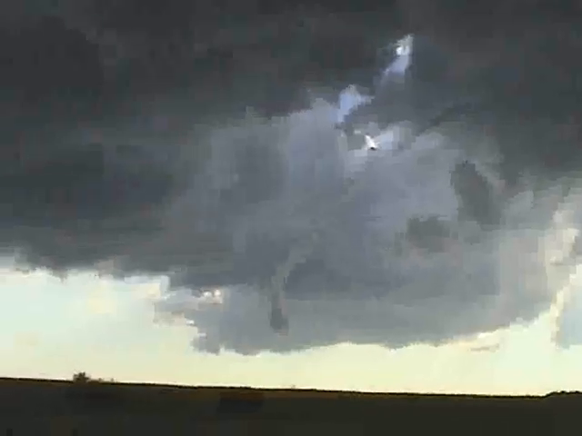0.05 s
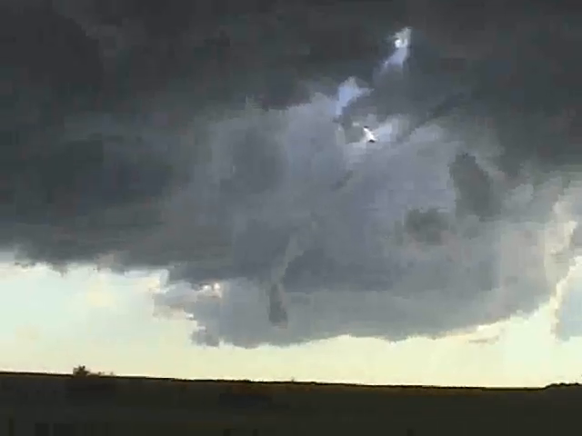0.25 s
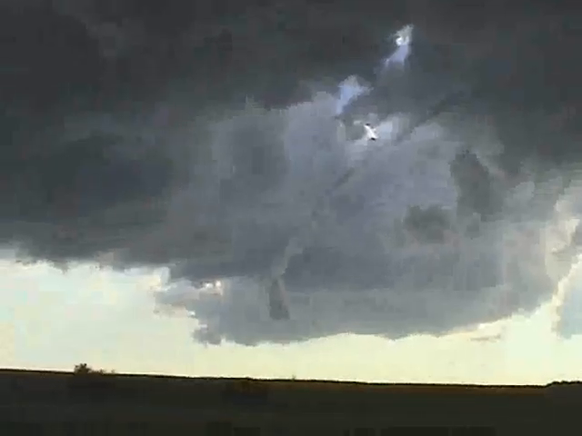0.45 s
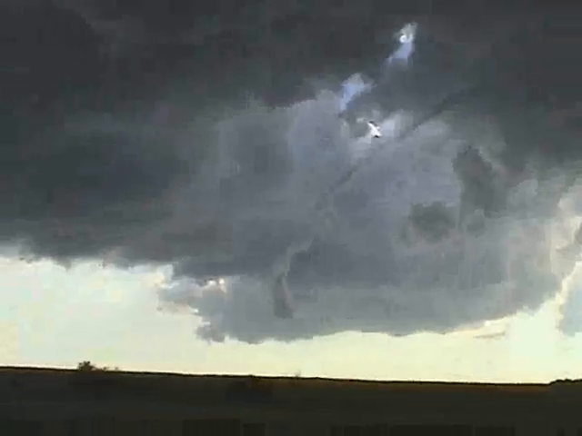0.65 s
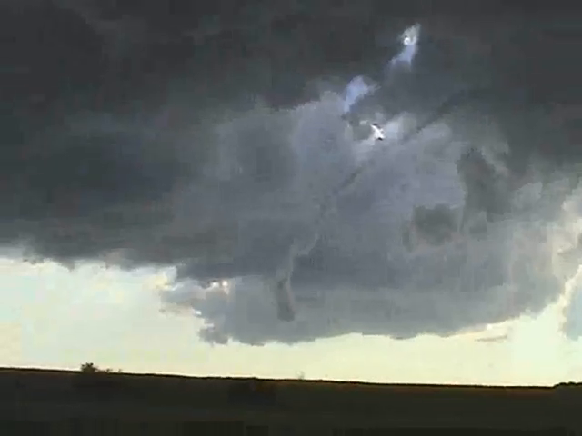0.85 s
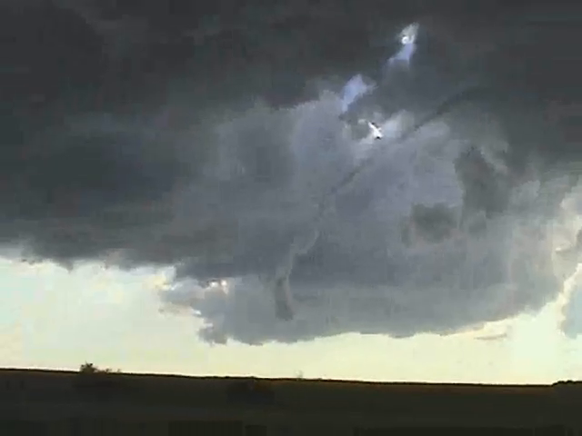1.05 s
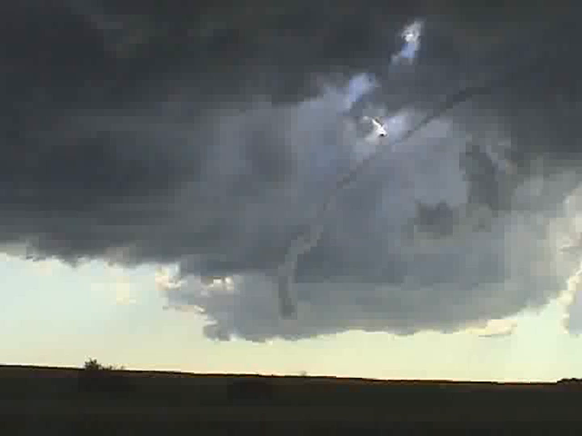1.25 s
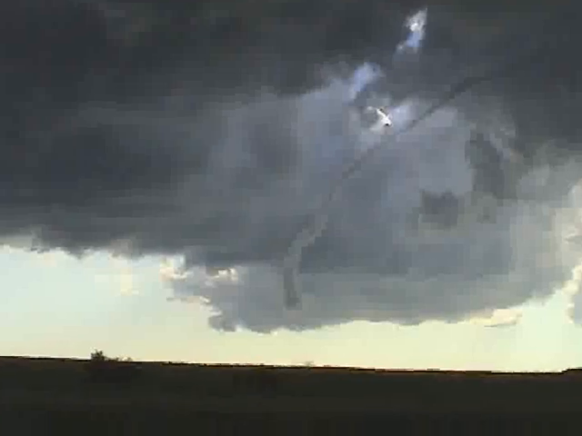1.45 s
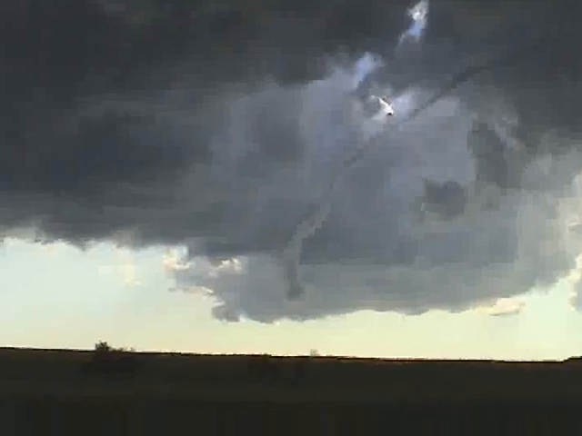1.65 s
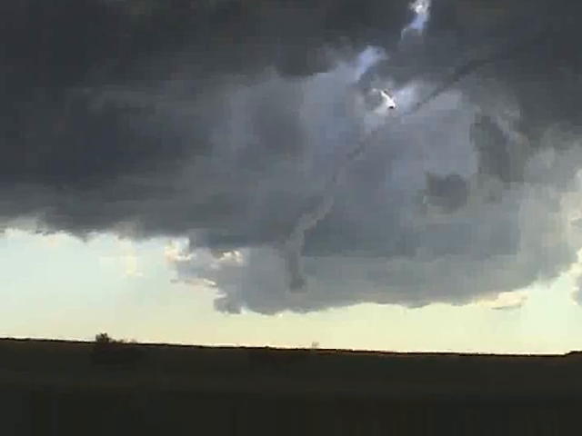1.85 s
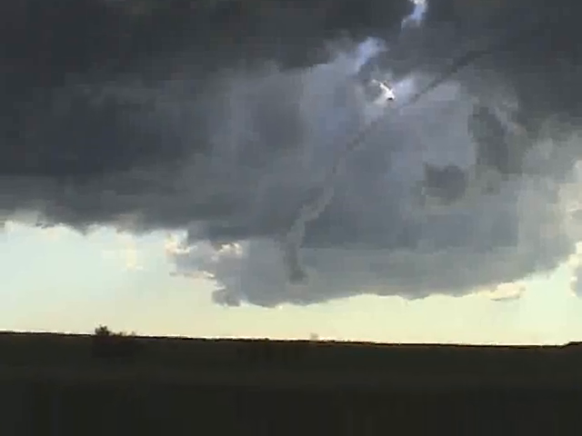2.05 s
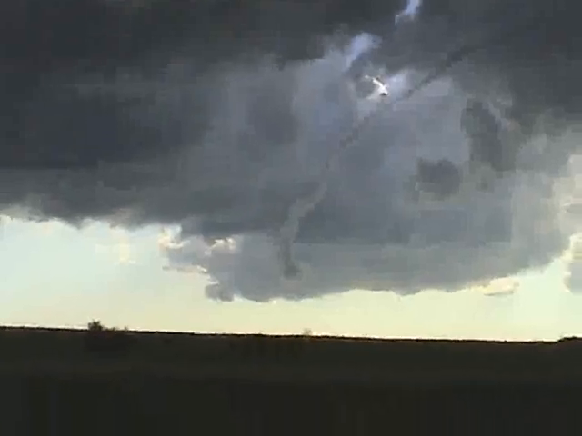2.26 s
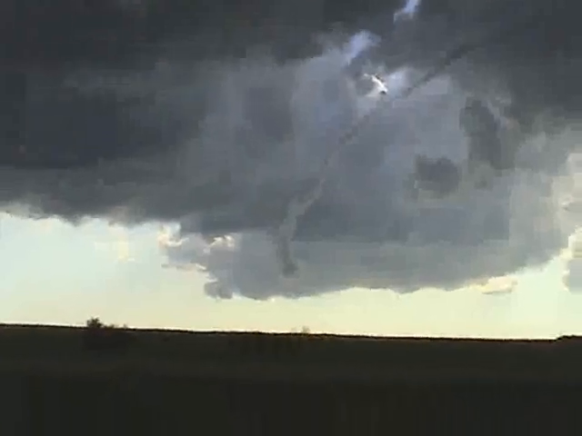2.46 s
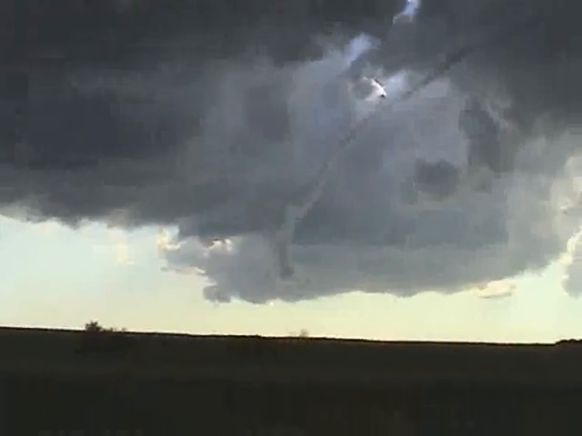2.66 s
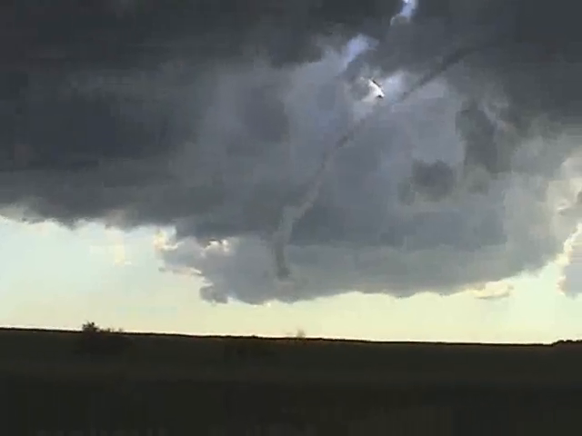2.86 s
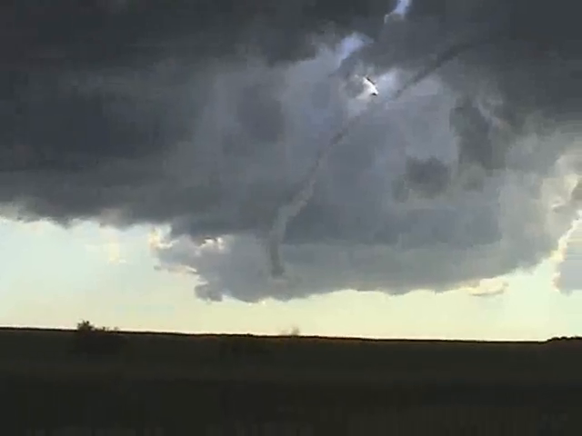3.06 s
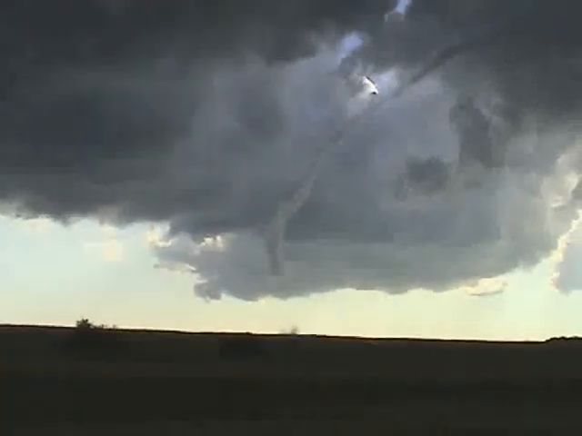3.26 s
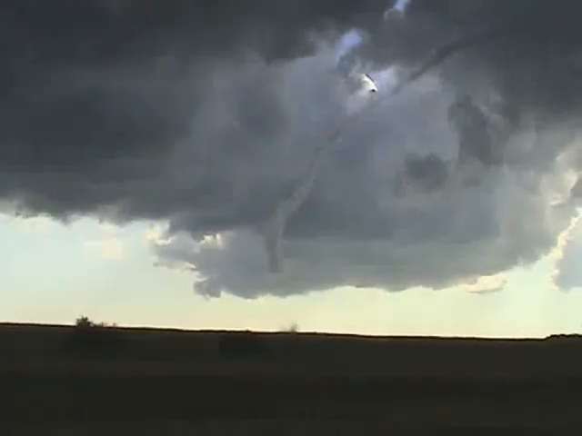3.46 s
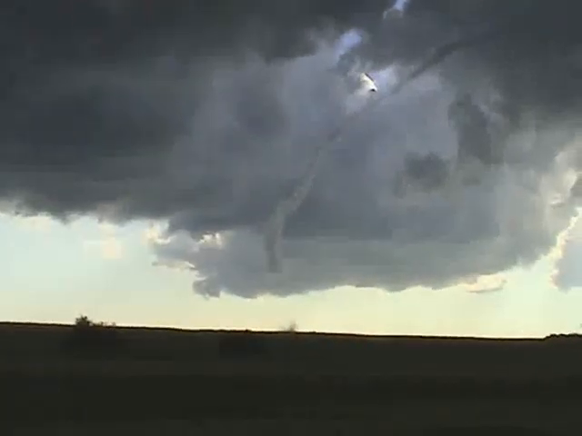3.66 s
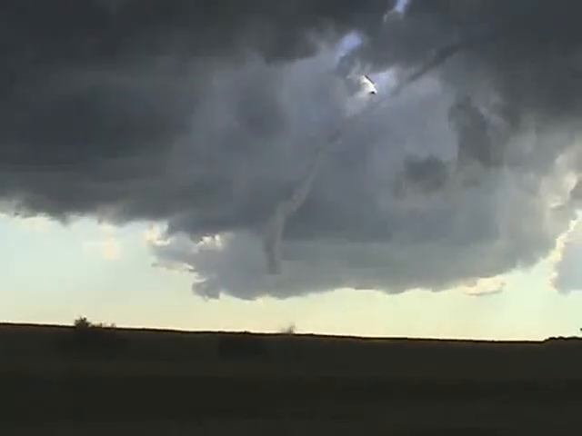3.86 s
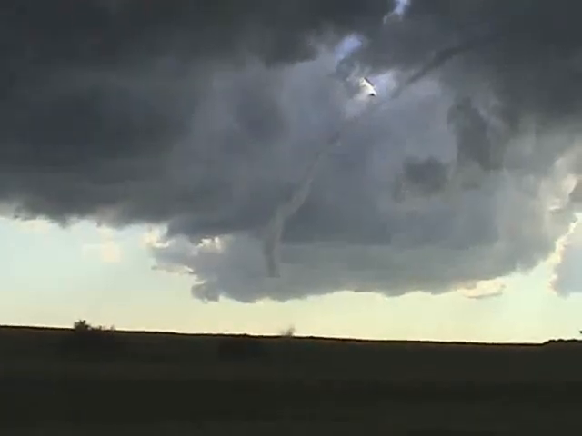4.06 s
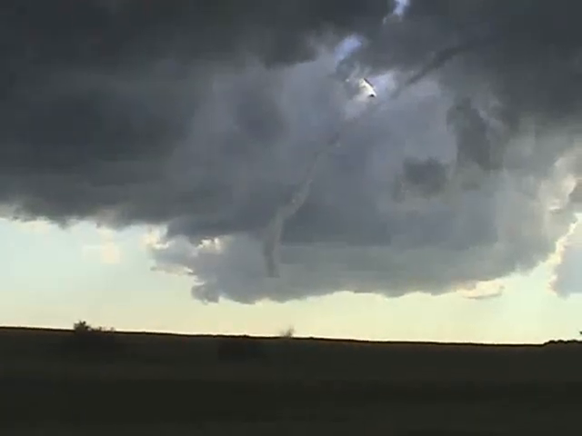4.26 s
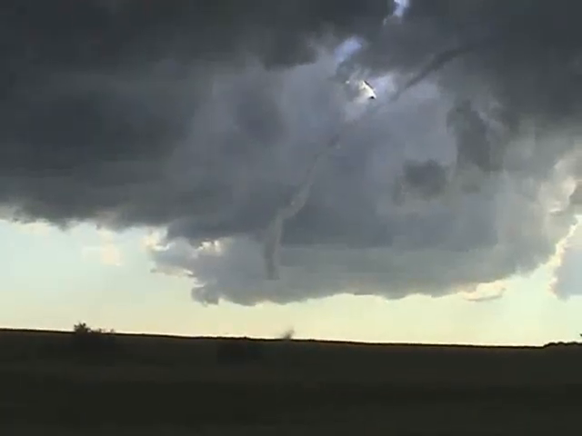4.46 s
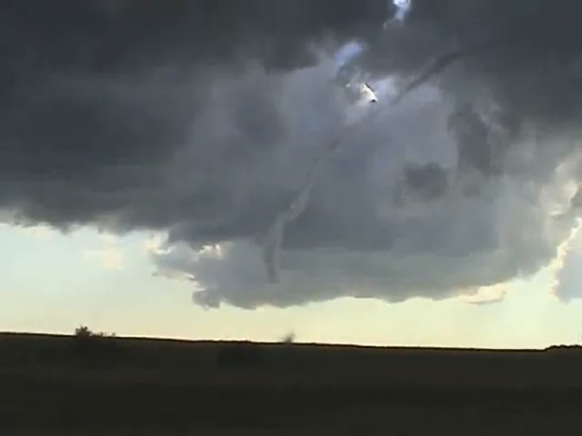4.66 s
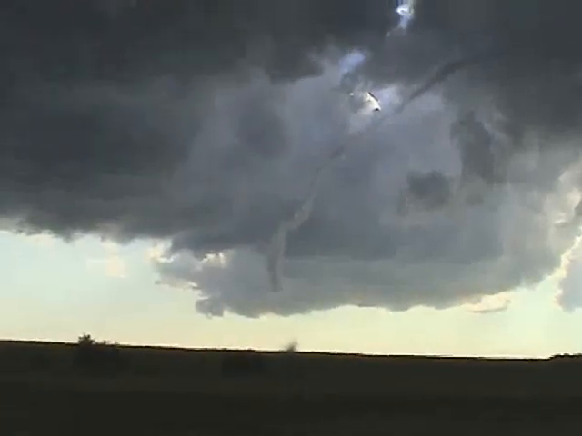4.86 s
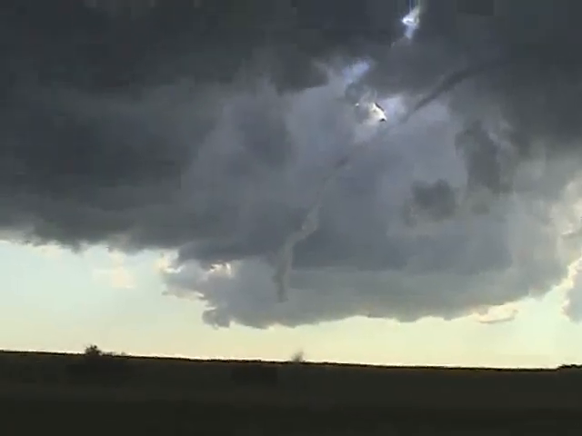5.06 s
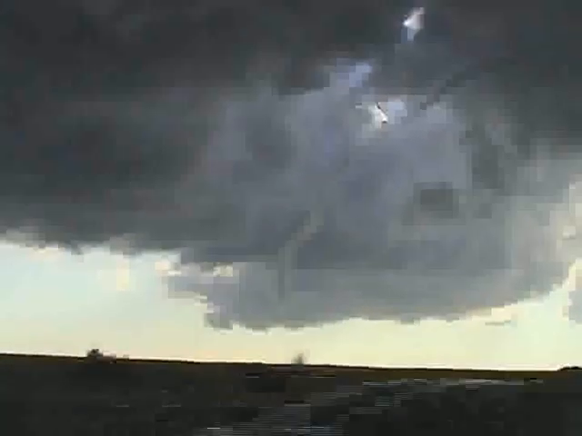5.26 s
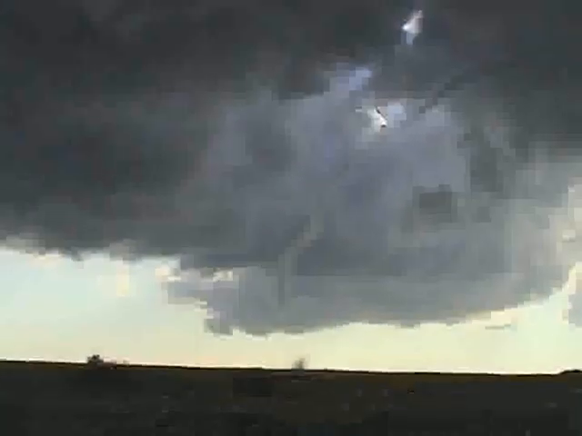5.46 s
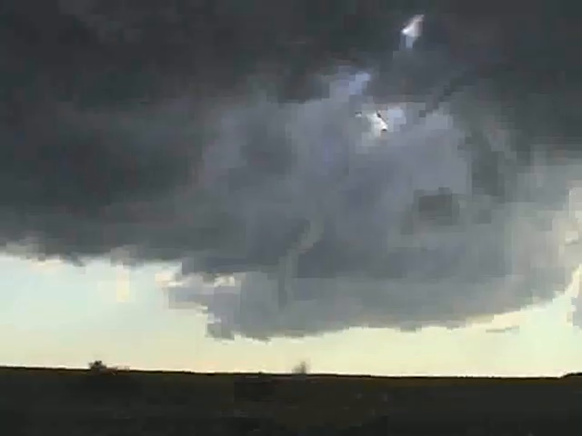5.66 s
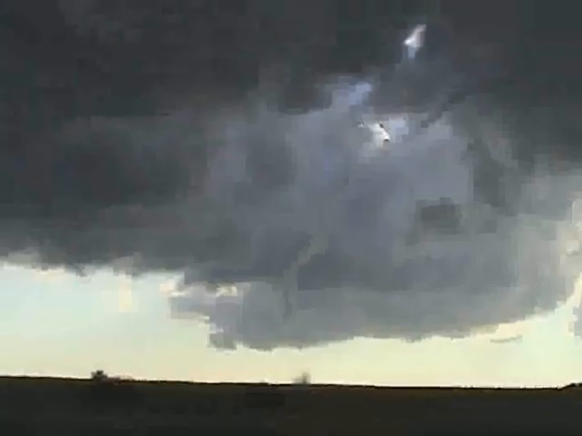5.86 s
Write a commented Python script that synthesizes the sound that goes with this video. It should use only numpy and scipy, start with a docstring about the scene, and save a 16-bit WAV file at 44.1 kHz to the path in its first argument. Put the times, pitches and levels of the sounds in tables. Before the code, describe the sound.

Over a low engine idle broken by short dropouts, tyre noise swells and a car sweeps by from left to right.

```python
"""A car passes an idling vehicle

A parked vehicle idles beside a country road while a car comes from far left, passes close by and
leaves to the right. Its tyres sing near 1 kHz over rumble and hiss, and drop in pitch as it goes by.
Faint high ticks sound in the field, over a soft drone, a light breeze and a thin, high hiss.
The sound cuts out seven times, for about a tenth of a second each."""
import sys
import numpy as np
from scipy import signal
from scipy.fft import rfft, irfft, next_fast_len
from scipy.io import wavfile
from scipy.ndimage import uniform_filter1d, map_coordinates

SR = 44100
rng = np.random.default_rng(int(sys.argv[2]) if len(sys.argv) > 2 else 0)


def generate_wav(sig):
    """Save sig (samples, or channels by samples) to the path in sys.argv[1] as 16-bit PCM at SR."""
    pcm = np.round(np.clip(np.atleast_2d(sig).T, -1, 1) * 32767).astype(np.int16)
    wavfile.write(sys.argv[1], SR, pcm)


N = 261051
TIME = np.arange(N) / SR
PASS_S, SPEED_M_S, ROAD_M = 5.22, 31.64, 7.2  # the car's nearest moment, speed and nearest distance


def passing_car(flutter_db=0.7, sound_speed_m_s=343):
    """Tyre, body and air noise sweep left to right, bent in pitch by the changing travel time."""
    ahead = SPEED_M_S * (PASS_S - TIME)  # metres up the road
    distance = np.hypot(ahead, ROAD_M)
    bearing = ahead / distance  # 1 coming, 0 abreast, -1 going
    sound = rolling_noise(ahead) + close_air(ahead, distance)
    sound *= amp(flutter_db * drift(19))  # uneven asphalt and moving air
    mach = SPEED_M_S / sound_speed_m_s
    doppler = (1 - mach) / (1 - bearing * mach)  # pitch ratio, 1 when head-on
    heard = np.array([map_coordinates(row, [np.cumsum(doppler)], order=3, mode="mirror")
                      for row in sound])
    return place_in_stereo(heard, leftness=(1 + bearing) / 2)


# The colours of the car's four noise layers, head-on. Each row: frequency in Hz, relative level in dB.
TYRE_SONG = [(450, -27), (720, -14), (850, -7.5), (950, -3), (1070, 2.5), (1160, -5), (1240, -3.5),
             (1330, -5), (1500, -8), (2000, -51)]
TYRE_RUSH = [(1000, -43), (1330, -19.5), (1440, -2), (1540, -11), (1650, 0.5), (1750, -2.5), (1860, 2),
             (1990, -4.5), (2130, -1.5), (2360, -8), (2460, -7), (2800, -15), (4200, -35.5)]
BODY_RUMBLE = [(25, -22), (55, -12), (100, -4.5), (230, 0), (340, -0.1), (470, -1.5), (650, -1),
               (900, -17.5), (1500, -39.5)]
ROAD_HISS = [(1500, -23.5), (2500, 2), (3200, 3), (4800, 0), (6500, -5.5), (8500, -12.5), (11500, -19.5),
             (15000, -45)]
# How each layer carries. Each lists: level abreast in dB, extra dB coming, extra dB going, dB lost
# far up the road, dB lost per doubling of distance, place ahead of the car's middle in metres.
SONG_CARRY = (-16, 4.5, -4, 6, 4, 4.5)
RUSH_CARRY = (-18, 9, 6, 2.38, 6, 1)
RUMBLE_CARRY = (-21, 4, -1.5, 5, 4.5, 4.5)
HISS_CARRY = (-20.5, 2.5, 1.5, 5, 6, 1)
# The upper layers swell and sink. Each row: time in seconds, rush gain in dB, hiss gain in dB.
SWELLS = [(0, 0, 4.5), (.5, -1, -.5), (1.2, -3.5, 3.5), (1.7, -5.5, -1.5), (2.2, -1.5, -4.5), (2.7, 0, 0.5),
          (3.2, -2, 2.5), (4.1, -3, 0.5), (4.76, -0.5, 1.5), (4.98, -2.5, -2.5), (5.33, 1, 0.4),
          (5.68, -6, -3.5), (5.86, -2.5, 6.5)]

def rolling_noise(ahead):
    """The tyres sing, rush and hiss over the body's rumble; each layer carries in its own way."""
    rush_db, hiss_db = curves(SWELLS)
    tread = tread_tones(ahead)
    song = carry_gain(ahead, *SONG_CARRY) * (coloured(TYRE_SONG) + tread)
    rush = carry_gain(ahead, *RUSH_CARRY) * amp(rush_db) * coloured(TYRE_RUSH)
    rumble = carry_gain(ahead, *RUMBLE_CARRY) * coloured(BODY_RUMBLE)
    hiss = carry_gain(ahead, *HISS_CARRY) * amp(hiss_db) * coloured(ROAD_HISS)
    return song + rush + rumble + hiss


# The notes of the tread pattern, head-on. Each row: pitch in Hz, waver width in Hz,
# level against the tyre song in dB, reach up the road in metres.
TREAD_TONES = [(806.5, 19.2, -10.5, 27), (913.5, 13.8, -5.5, 22), (1040, 21, -11, 300), (1103, 5.5, -3, 53),
               (1093, 26.1, 0, 7), (1188, 13.9, 0, 13), (1197, 9.9, -12.5, 130), (1630, 22, -13, 150)]

def tread_tones(ahead, flutter_db=2, behind_m=10.3):
    """The tread throws its tones along the lane: clear as the car nears, soon gone behind it."""
    tones = np.zeros((2, N))
    for hz, width_hz, db, reach_m in TREAD_TONES:
        remoteness = ahead / np.where(ahead > 0, reach_m, behind_m)
        level = amp(db + flutter_db * drift(11.5)) / np.hypot(1, remoteness ** 2)
        tones += level * wavering_tone(hz, width_hz)
    return tones


def close_air(ahead, distance, fizz_db=-26, fizz_hz=6800, push_db=-22, push_hz=250, lead_m=2.6):
    """Fine fizz and the low rush of air pushed ahead of the car, heard only at close range."""
    fizz = noise(lambda hz: (hz / fizz_hz) ** 3 / (1 + (hz / fizz_hz) ** 6))
    push = noise(lambda hz: hz / push_hz / (1 + (hz / push_hz) ** 7))
    fizz *= amp(fizz_db) * (ROAD_M / distance) ** 3
    push *= amp(push_db) * (ROAD_M / np.hypot(ahead - lead_m, ROAD_M)) ** 3
    return fizz + push


def carry_gain(ahead, abreast_db, coming_db, going_db, shade_db, doubling_db, lead_m):
    """Car noise spreads, is thrown along the lane, and is shaded by ground cover far up the road."""
    clear_m, clearing_m = 24.9, 2.58  # where the car comes clear of the cover, and how gradually
    distance = np.hypot(ahead - lead_m, ROAD_M)
    thrown_db = np.where(ahead > lead_m, coming_db, going_db) * ((ahead - lead_m) / distance) ** 2
    shaded = (1 + np.tanh((ahead - clear_m) / (2 * clearing_m))) / 2
    return amp(abreast_db + thrown_db - shade_db * shaded - doubling_db * np.log2(distance / ROAD_M))


# The idle sags and softens. Each row: time in seconds, firing rate in Hz, hum level in dB.
IDLE = [(0, 77.9, -32), (1.2, 77.2, -33.5), (2.2, 76.35, -35.5), (3.2, 76.08, -38.5), (4.2, 75.7, -37),
        (5.92, 76.1, -40)]
# The partials of the hum. Each row: multiple of the firing rate, relative level in dB.
ENGINE_ORDERS = [(1, 1), (1.5, -39), (2, -2.5), (3, -15.5), (4, -16), (5, -22), (6, -11.5)]
# The colour of the fan and block noise. Each row: frequency in Hz, relative level in dB.
ENGINE_WASH = [(20, -14), (45, -14), (70, 0), (120, -1), (200, -14), (420, -1.5), (560, -7), (700, -3.5),
               (1400, -17), (2400, -23.5), (5000, -43)]

def idling_engine(wander=0.004, uneven_db=0.7, wash_db=-35.5, throb=0.19):
    """Firing harmonics waver a little, over fan and block noise that throbs with each firing."""
    firing_hz, level_db = curves(IDLE)
    phase = 2 * np.pi * np.cumsum(firing_hz * (1 + wander * drift(8.5))) / SR
    hum = np.zeros(N)
    for order, db in ENGINE_ORDERS:
        level = amp(db - uneven_db * drift(4.5))
        hum += level * np.cos(order * phase + 2 * np.pi * rng.random())
    direct_hum = np.array([amp(level_db) * unit(hum), np.zeros(N)])
    wash = amp(wash_db) * coloured(ENGINE_WASH) * (1 + throb * np.cos(phase))
    return place_in_stereo(direct_hum, leftness=0.9) + place_in_stereo(wash, leftness=0.8)


# Ticks in the field. Each row: start in seconds, level in dB, decay in seconds, low cut in Hz.
TICKS = [(0.526, -33.5, 0.016, 2700), (1.243, -33, .006, 3970), (1.561, -34.5, 0.0055, 3930),
         (1.884, -33, .012, 2700), (2.168, -36, 0.0065, 4040), (2.489, -32, .01, 2700),
         (2.896, -37, .005, 3500), (3.187, -33.5, 0.016, 2700), (3.86, -32.5, .008, 3200)]
# Their thin, bright colour. Each row: frequency in Hz, relative level in dB.
TICK_COLOUR = [(2000, -7), (3300, 5.5), (4200, -3.5), (5500, -5), (7000, 1), (8000, -14), (11500, -8.5)]

def field_ticks(rise_s=0.0068):
    """Short dry rasps, perhaps an insect in the grass."""
    out = np.zeros(N)
    for start, db, decay, low_hz in TICKS:
        age = np.maximum(TIME - start, 0)
        envelope = np.minimum(age / rise_s, 1) * np.exp(-np.maximum(age - rise_s, 0) / decay)
        rasp = noise(lambda hz: amp(spectra(TICK_COLOUR, hz)[0]) / (1 + (low_hz / (hz + 1)) ** 10))
        out += amp(db) * envelope * rasp[0]
    return out


def faint_drone():
    """A soft, nearly steady tone that comes up about halfway through."""
    level_db = np.interp(TIME, [0, 2.6, 3.2, 5.92], [-60, -54, -45, -44])
    return place_in_stereo(amp(level_db) * wavering_tone(hz=250, width_hz=0.96), leftness=0.64)


def breeze(level_db=-52, corner_hz=45):
    """Light wind rumbles on each microphone port separately."""
    return amp(level_db) * noise(lambda hz: 1 / (1 + (hz / corner_hz) ** 2))


# The colour of the high hiss. Each row: frequency in Hz, relative level in dB.
HIGH_HISS_COLOUR = [(1500, -16), (3000, -8), (5000, -10), (8000, -14), (9800, -11), (10800, 0), (12000, 0),
                    (12600, -40)]
# Its slow rise and fall. Each row: time in seconds, level in dB.
HIGH_HISS_LEVEL = [(0, -53.5), (3.3, -49), (5.92, -51)]

def high_hiss():
    """A thin, high, centred hiss that slowly swells, then eases."""
    return amp(curves(HIGH_HISS_LEVEL)[0]) * coloured(HIGH_HISS_COLOUR)[0]


# The stereo image. Each row: frequency in Hz, left-over-right level in dB and left phase lead in
# radians for a source at far left, the same two for far right, likeness of the channels from 0 to 1.
STEREO_IMAGE = [(69.7, -5, 1.23, 1, 0.21, 0.99), (200, -4, 0.61, -1.5, -0.15, 0.98),
                (500, -1.2, 1, -2.5, -0.44, 1), (1070, 4, 0.88, -7, -0.92, 0.89),
                (2100, 5.5, 1.21, -8, -0.21, 1)]

def place_in_stereo(pair, leftness, mono_above_hz=2365):
    """Places the lows and mids between far right (0) and far left (1); the treble stays centred."""
    hz, times, (direct, diffuse) = signal.stft(pair, SR, nperseg=1024)
    left_db, left_lead, right_db, right_lead, likeness = (c[:, None] for c in spectra(STEREO_IMAGE, hz))
    pan = np.interp(times, TIME, leftness * np.ones(N))
    width = 1 / (1 + (hz[:, None] / mono_above_hz) ** 20)
    balance_db = width * (pan * left_db + (1 - pan) * right_db)
    lead = width * (pan * left_lead + (1 - pan) * right_lead)
    tilt = amp(balance_db / 2) * np.exp(.5j * lead)
    side = diffuse * width * np.sqrt((1 - np.clip(likeness, 0, 1)) / 2)
    channels = np.array([(direct + side) * tilt, (direct - side) / tilt])
    return signal.istft(channels, SR, nperseg=1024)[1][:, :N]


def wavering_tone(hz, width_hz):
    """Two unrelated tones of steady strength; more width makes the pitch waver further and faster."""
    wobble_hz = 1.5 * width_hz * noise(lambda f: np.exp(-(f / (4 * width_hz)) ** 2))
    turns = np.cumsum(hz + wobble_hz, axis=1) / SR + rng.random((2, 1))
    return unit(np.cos(2 * np.pi * turns))


def noise(gain):
    """Two unrelated noises, shaped by gain(Hz) and scaled to rms 1."""
    size = next_fast_len(N)
    white = rfft(rng.standard_normal((2, size)))
    return unit(irfft(white * gain(np.fft.rfftfreq(size, 1 / SR)), size)[:, :N])


def coloured(points):
    """A noise pair with a colour of (Hz, dB) points."""
    return noise(lambda hz: amp(spectra(points, hz)[0]))


def drift(rate_hz, hop=100):
    """A slow random wander of rms 1, rolling off above the given rate."""
    times = TIME[::hop]
    lowpass = np.exp(-(np.fft.rfftfreq(len(times), hop / SR) / rate_hz) ** 2)
    slow = irfft(rfft(rng.standard_normal(len(times))) * lowpass, len(times))
    return np.interp(TIME, times, unit(slow))


def curves(rows):
    """Each column of a table of (seconds, ..) rows, at every sample."""
    times, *columns = np.transpose(rows)
    return [np.interp(TIME, times, c) for c in columns]


def spectra(rows, hz):
    """Each column of a table of (Hz, ..) rows, on a log-frequency axis."""
    row_hz, *columns = np.transpose(rows)
    return [np.interp(np.log(hz + 1), np.log(row_hz), c) for c in columns]


def amp(db):
    """Decibels to gain."""
    return 10 ** (np.asarray(db) / 20)


def unit(x):
    """Scales to rms 1."""
    return x / np.sqrt(np.mean(x ** 2) + 1e-20)


def scene():
    """The car, the parked engine and the ticks, over a quiet bed of drone, breeze and hiss."""
    bed = faint_drone() + breeze() + high_hiss()
    return passing_car() + idling_engine() + field_ticks() + bed


# Holes in the sound. Each row: start in seconds, end in seconds, seconds for which a remnant lingers.
DROPOUTS = [(.1023, .2015, .018), (.6678, .7791, 0), (.8812, .9472, .022), (1.2484, 1.3142, .027),
            (1.7488, 1.815, .02), (2.6838, 2.805, 0), (3.2237, 3.3238, 0)]

def record(dry, remnant_db=-21, limit_db=-8.0, ceiling=0.96, top_hz=11930):
    """Abrupt dropouts, some with a faint dying remnant; then a quick limiter, soft clip and high cut."""
    gate = np.ones(N)
    for start, end, linger in DROPOUTS:
        lost = (TIME >= start) & (TIME < end)
        gate[lost] = amp(remnant_db) * np.exp(-((TIME[lost] - start) / linger) ** 4) if linger else 0
    gated = dry * uniform_filter1d(gate, size=12)
    power = uniform_filter1d(gated ** 2, size=400).max(axis=0)  # the louder channel, over 9 ms
    limited = gated / (1 + (power / amp(limit_db) ** 2) ** 3) ** (1 / 6)
    rounded = limited / (1 + (limited / ceiling) ** 8) ** (1 / 8)
    lowpass = signal.firwin(401, top_hz, window=("kaiser", 8), fs=SR)
    return signal.oaconvolve(rounded, lowpass[None], "same")


dry = scene()
out = record(dry)
generate_wav(out)
```